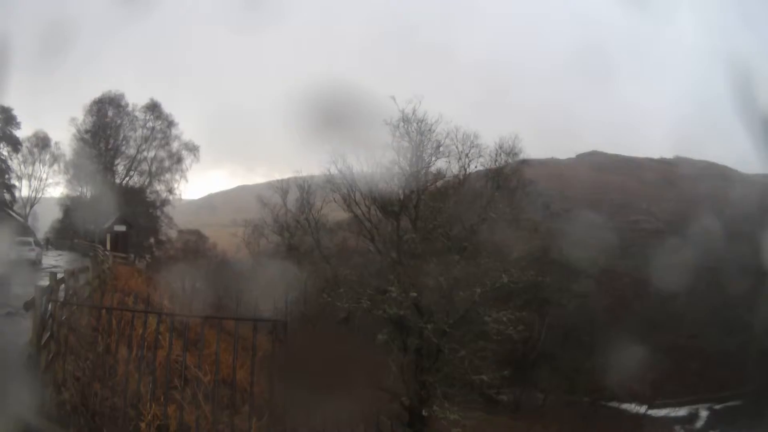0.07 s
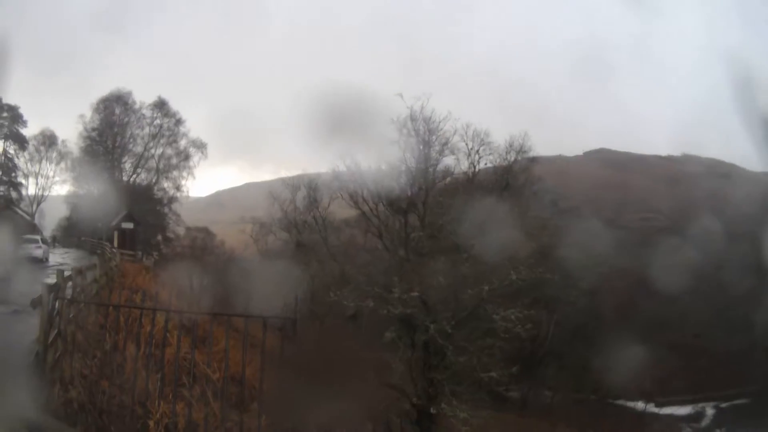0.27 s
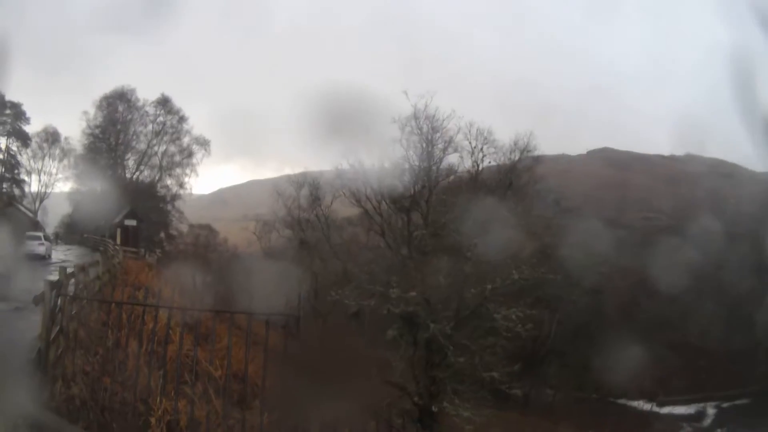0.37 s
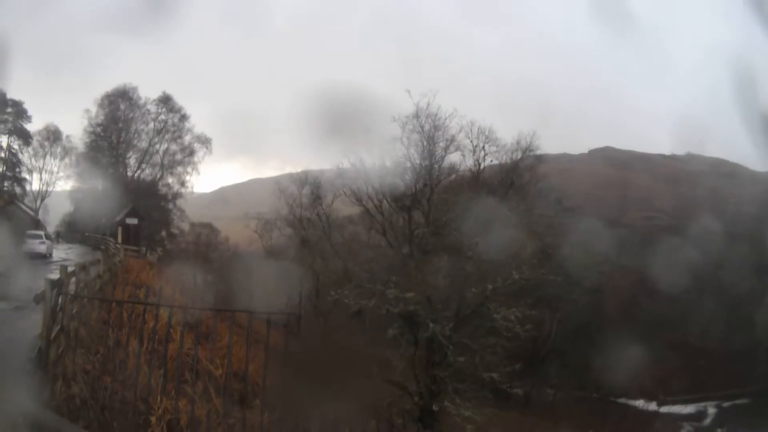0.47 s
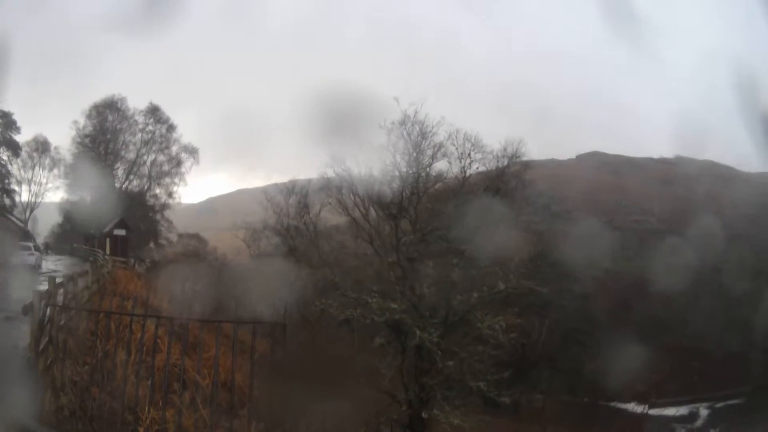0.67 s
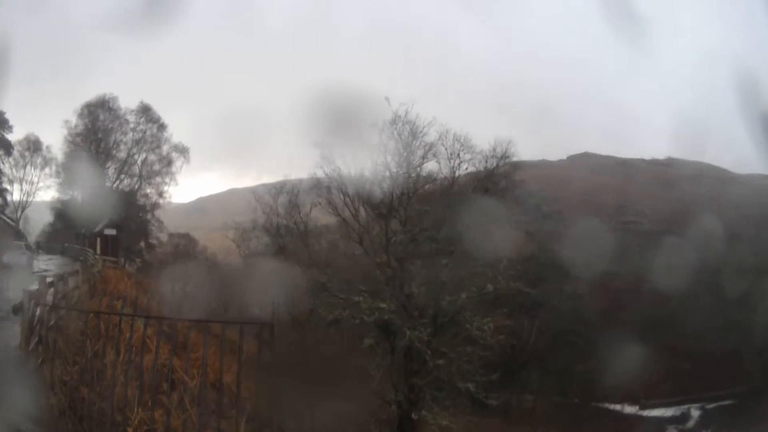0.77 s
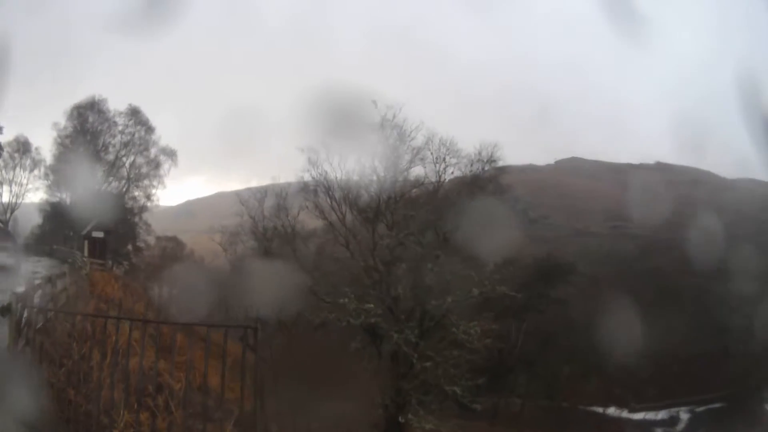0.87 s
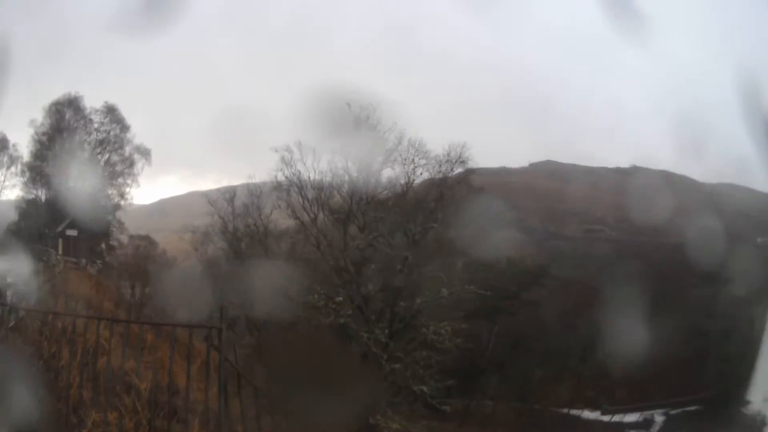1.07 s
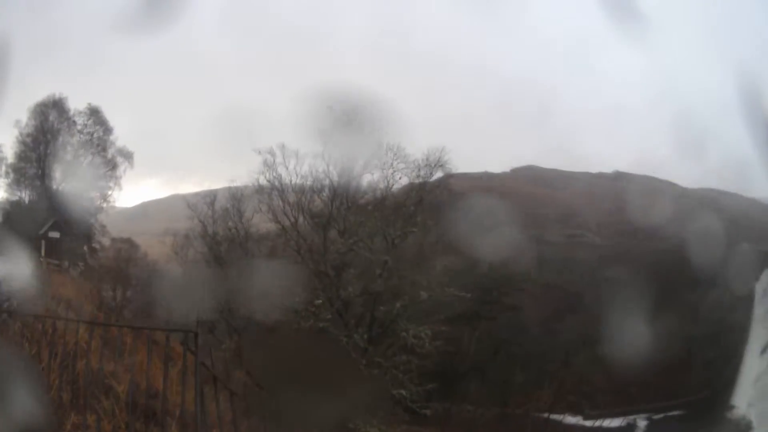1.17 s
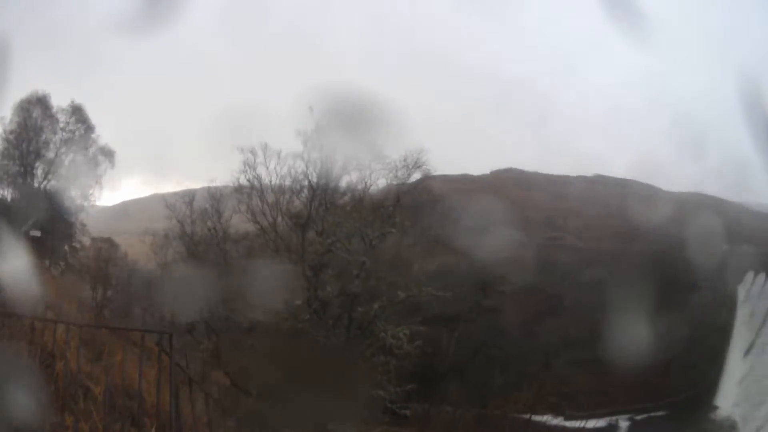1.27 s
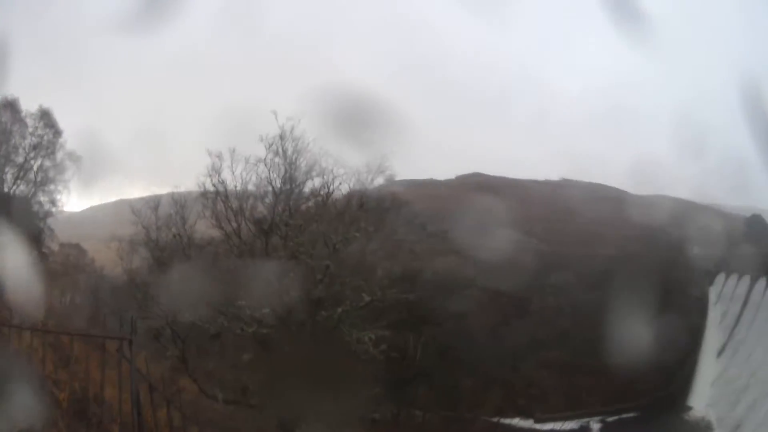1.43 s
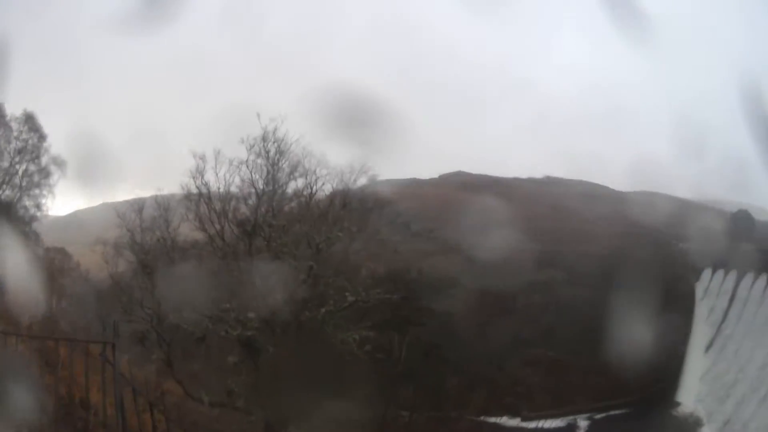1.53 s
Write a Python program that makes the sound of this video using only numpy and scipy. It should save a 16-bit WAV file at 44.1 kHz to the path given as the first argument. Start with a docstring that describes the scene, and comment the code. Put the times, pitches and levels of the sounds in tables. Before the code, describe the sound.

Hail clicks and knocks on a hollow casing right at the microphone, outdoors. The hits build quickly to one loud crack, then thin out over fine sleet patter, rain hiss and low wind that rises near the end.

```python
"""Sleet and hail blow against a camera housing; each impact excites modes that decay exponentially.
From the start rain hisses, wind rumbles and resonates in the hollow housing, and fine sleet patters.
Stones soon tick on the thin microphone cover and knock the shell, wet lumps plop, and the rim pings.
The loudest hits carry a low thump and clip with a harsh crack; at 0.4 s the largest stone shatters.
The hail then thins out, and a gust rises near the end."""
import sys
import numpy as np
from scipy import signal
from scipy.fft import rfft, irfft
from scipy.io import wavfile

SR = 44100
rng = np.random.default_rng(int(sys.argv[2]) if len(sys.argv) > 2 else 0)


def unload_audio(sound):
    """Save the sound as a 16-bit wav file, at the path given as the first command line argument."""
    columns = np.transpose(np.atleast_2d(sound))
    # keep every value between -1 and 1, then stretch to whole-number steps
    steps = np.round(np.clip(columns, -1, 1) * 32767)
    wavfile.write(sys.argv[1], SR, steps.astype(np.int16))


N = 70560
TIME = np.arange(N) / SR


def amp(db):
    """Decibels to amplitude ratio."""
    return 10 ** (np.asarray(db) / 20)


def unit_rms(x):
    """Normalisation to rms 1."""
    return x / np.sqrt(np.mean(x ** 2) + 1e-20)


def add(mix, start_s, sound):
    """Superposition of a sound on the mix."""
    part = mix[max(round(start_s * SR), 0):][:len(sound)]
    part += sound[:len(part)]


def low_cut(x, hz):
    """Second-order high-pass filtering."""
    return signal.sosfilt(signal.butter(2, hz, "high", fs=SR, output="sos"), x)


def noise(spectrum):
    """Spectral shaping of white noise, at rms 1."""
    hz, db = np.transpose(spectrum)
    freqs = np.fft.rfftfreq(N, 1 / SR)
    gain = amp(np.interp(np.log(freqs + 1), np.log(hz), db))
    return unit_rms(irfft(rfft(rng.standard_normal(N)) * gain, N))


def flutter(rate_hz, depth_db):
    """Random amplitude modulation: a gain that wanders at rates around rate_hz."""
    ratio = np.fft.rfftfreq(N, 1 / SR) / rate_hz
    wander = irfft(rfft(rng.standard_normal(N)) * ratio / (1 + ratio ** 4), N)
    return amp(depth_db * unit_rms(wander))


def ring(modes, stretch=1, contact_s=0.00019):
    """Impact response: modes build up during contact, then decay by 60 dB in stretch * t60."""
    t = np.arange(SR // 8) / SR
    onset = 1 - np.exp(-t / contact_s)
    waves = sum(amp(db) * np.exp(-np.log(1000) * t / (t60 * stretch)) * np.sin(2 * np.pi * hz * t)
                for hz, db, t60 in modes)
    return onset * waves / np.sqrt(sum(amp(db) ** 2 for _, db, _ in modes))


# Spectra of buffeting, cavity noise and rain: (frequency [Hz], relative density [dB])
RUMBLE_SPECTRUM = [(20, -24), (45, -10), (85, 1.5), (170, 2.5), (300, -4.5), (500, -17), (1200, -38)]
CAVITY_SPECTRUM = [(100, -35.5), (300, -13), (560, -13.5), (700, -12.5), (800, 7.5), (860, 1), (930, 2),
                   (1020, -5.5), (1120, -2.5), (1300, -11.5), (1600, -19), (2200, -23.5), (3400, -12),
                   (4500, -22), (5500, -33.5), (8500, -42)]
RAIN_SPECTRUM = [(200, -3), (1500, 0), (2200, -6.5), (2800, -3.5), (3150, -8.5), (3500, 0.5), (3850, -3),
                 (4300, 0.5), (4620, -2.5), (4950, -27.5), (5700, -26), (6400, -14.5), (6900, -13),
                 (7700, -16), (8500, -45)]
# Relative envelopes: (time [s], rumble level [dB], cavity level [dB], rain level [dB])
WEATHER_LEVELS = [(0, -42, -40.5, -47), (.13, -48, -40, -43.5), (.27, -47.5, -45, -46.5),
                  (.42, -52, -52.5, -46), (.58, -43.5, -38.5, -50), (.71, -58.5, -47.5, -49.5),
                  (.8, -46.5, -46, -51), (.86, -43, -41.5, -50), (.97, -51, -47.5, -51),
                  (1.07, -45.5, -39.5, -44.5), (1.16, -51, -42.5, -52.5), (1.22, -38.5, -38, -50.5),
                  (1.34, -38, -33, -44.5), (1.409, -42.5, -39.5, -49), (1.51, -38, -39.5, -47.5),
                  (1.6, -39.5, -44.5, -46.5)]


def wind_and_rain():
    """Broadband excitation: wind buffets the microphone and drives cavity resonances as rain hisses."""
    times, *levels = np.transpose(WEATHER_LEVELS)
    rumble_db, cavity_db, rain_db = (np.interp(TIME, times, db) for db in levels)
    rumble = amp(rumble_db - 6) * noise(RUMBLE_SPECTRUM) * flutter(rate_hz=50, depth_db=2.75)
    cavity = amp(cavity_db - 1.5) * noise(CAVITY_SPECTRUM) * flutter(rate_hz=20, depth_db=1.13)
    rain = amp(rain_db + 1) * noise(RAIN_SPECTRUM) * flutter(rate_hz=60, depth_db=2.54)
    return rumble + cavity + rain


# Modes of the cover, its bright edge and the hollow body: (frequency [Hz], relative level [dB], t60 [s])
COVER_MODES = [(450, -21.5, 0.0052), (2106, -18, 0.0036), (3182, 1, 0.0024), (4105, 4, 0.0031),
               (4480, -7.5, 0.0016), (5400, -23, 0.0041)]
EDGE_MODES = [(6286, 18.5, 0.0055), (6960, 5, 0.0085), (7120, -14, 0.0014)]
BODY_MODES = [(620, -16, 0.013), (801.7, -3.5, 0.067), (1050, 4, .012), (1127, 0, 0.028),
              (1290, -16, 0.004), (2000, -33, .008)]


def patter(grains_per_s=400, floor_db=-40.5, spread_db=4):
    """Shot noise: fine sleet lands at random, each grain exciting the housing's parts differently."""
    grain_db = floor_db + spread_db * np.minimum(rng.exponential(1, N), 4)
    impulses = amp(grain_db) * (rng.random(N) < grains_per_s / SR)
    parts = [(COVER_MODES, 0), (EDGE_MODES, -35), (BODY_MODES, -35.5)]
    return sum(amp(db) * signal.fftconvolve(impulses * rng.uniform(-1.1, 1, N), ring(modes))[:N]
               for modes, db in parts)


def stones(hits, modes, gain_db, low_hz, scatter=0.12):
    """Modal superposition: each stone rings the struck part, the bright edge and the hollow body."""
    out = np.zeros(N)
    edge, body = ring(EDGE_MODES), low_cut(ring(BODY_MODES), hz=475)
    spots = rng.uniform(-1.1, 1, (len(hits), len(modes)))
    for (start_s, hit_db, edge_db, body_db, stretch), spot in zip(hits, spots):
        # Light, short blows land on different spots, so their mode frequencies scatter.
        detune = 1 + scatter * max(1 - stretch, 0) * spot
        spot_modes = [(hz * shift, db, t60) for (hz, db, t60), shift in zip(modes, detune)]
        struck = amp(hit_db + gain_db) * low_cut(ring(spot_modes, stretch), low_hz)
        add(out, start_s, struck + amp(edge_db) * edge + amp(body_db) * body)
    return out


# Cover impacts: (time [s], relative level [dB], edge level [dB], body level [dB], decay stretch [ratio])
COVER_HITS = [(.0655, -6.5, -15, -27.5, 0.83), (.1128, -12, -19.5, -32, 1.23), (.1574, -16, -37, -38, 1.15),
              (.1747, -20, -58, -33, 0.56), (.2241, 4.5, -13.5, -36, 1.08), (.3324, 0, -43, -50, 0.99),
              (.3365, 1.5, -28, -28, 1.3), (.4174, -18, -42, -32, 1.6), (.4360, -12, -28, -66, 0.64),
              (.5494, -13.5, -48, -61, 0.97), (.5598, -21, -50, -33, 0.89), (.6374, -25, -29.5, -29, 1.4),
              (.7148, -29, -49, -59.5, 1.26), (.7921, -21, -30.5, -36.5, 1.14),
              (.8353, -9, -19.5, -32.5, 1.1), (.8663, -22.5, -58, -44, 1.2),
              (1.0229, -21.5, -44, -40, 0.55), (1.0347, -14, -40, -44, 0.66), (1.0517, -29, -37, -32.5, 1),
              (1.0628, -19.5, -35, -49, 1), (1.1112, -20, -32.5, -31, 1.24)]


def ticks():
    """Heavy damping: the thin cover, struck by small stones, rings for only milliseconds."""
    return stones(COVER_HITS, COVER_MODES, gain_db=4, low_hz=120)


# Shell impacts: (time [s], relative level [dB], edge level [dB], body level [dB], decay stretch [ratio])
SHELL_HITS = [(.0732, -28, -30, -25, 0.48), (.3240, -26, -42, -19, 0.44), (.3459, -29, -46, -22, 0.71),
              (.3670, -13.5, -36, -22.5, 0.52), (.3843, -11, -15, -29, 0.81), (.3935, 4, -8, -34, 0.76),
              (.4300, -14.5, -22, -26.5, 0.81), (.4667, -13, -13.5, -17, 0.45),
              (.4722, -26.5, -31, -60, .5), (.5158, -50, -41, -28, .7), (.5448, -20.5, -26.5, -26.5, 0.65),
              (.5533, -32, -42, -37, 0.56), (.5973, -23.5, -48, -38.5, 0.64),
              (.6812, -49, -39, -38.5, 0.35), (.8745, -34, -47.5, -44, 0.36),
              (.8880, -31, -33, -54.5, 0.48)]
# Shell resonances: (frequency [Hz], relative level [dB], t60 [s])
SHELL_MODES = [(929, -8.5, 0.03), (1505, -7, .014), (1567, -8, 0.018), (2300, -11, 0.012), (2262, -9, .047),
               (2997, -7, 0.017), (3250, -10, 0.0097), (3300, -11.5, 0.036), (3534, -6.5, 0.015),
               (3760, -12, 0.023), (4120, -5.5, 0.013), (5355, -15, 0.03), (6550, -17.5, 0.032),
               (6880, -18, 0.022), (7540, -10.5, 0.017), (8420, -22.5, 0.014)]


def knocks():
    """Inharmonic vibration: larger stones excite the many modes of the shell in a clack."""
    return stones(SHELL_HITS, SHELL_MODES, gain_db=1, low_hz=450)


# Soft impacts: (time [s], level before filtering [dB], decay stretch [ratio], cutoff [Hz])
WET_LUMPS = [(.1125, -20, 2.2, 855), (.3242, -28, 0.23, 1600), (0.405, -13.5, 0.43, 1640),
             (.4677, -10.5, 0.85, 3000), (0.516, -27, 0.7, 1080), (.8878, -22, 2.1, 884)]


def plops():
    """Soft contact is a low-pass filter: the softer the wet lump, the duller the hollow body rings."""
    out = np.zeros(N)
    for start_s, db, stretch, cutoff_hz in WET_LUMPS:
        softness = signal.butter(3, cutoff_hz, fs=SR, output="sos")
        body = ring(BODY_MODES, stretch, contact_s=0.00017)
        add(out, start_s, amp(db) * signal.sosfilt(softness, body))
    return low_cut(out, hz=475)


# Rim impacts: (time [s], relative level [dB], edge level [dB], body level [dB], decay stretch [ratio])
RIM_HITS = [(.2007, -19.5, -34, -44, 0.8), (.4374, -14.5, -42, -58, 0.66), (.6088, -24, -39, -32, 1.4),
            (.9541, -25, -24.5, -47, 0.66)]
# Rim resonances: (frequency [Hz], relative level [dB], t60 [s])
RIM_MODES = [(3480, -8.5, 0.0047), (4380, -1, 0.012), (6860, -5.5, 0.0053)]


def pings():
    """Free vibration: glancing stones leave the rim ringing, pitched by one dominant mode."""
    return stones(RIM_HITS, RIM_MODES, gain_db=2, low_hz=607)


# Thumps under the loudest hits: (time [s], level [dB])
THUMP_HITS = [(0.2261, -27.5), (0.336, -28.5), (0.3943, -15.5)]
# Low components of a thump: (frequency [Hz], relative level [dB], t60 [s])
THUMP_MODES = [(75, -21, 0.012), (176, 6, 0.017)]


def thumps():
    """Damped oscillation: a short, low thump sounds under the loudest hits."""
    out = np.zeros(N)
    for start_s, db in THUMP_HITS:
        add(out, start_s, amp(db) * ring(THUMP_MODES))
    return low_cut(out, hz=46)


# Spectrum of ice splinters: (frequency [Hz], relative density [dB])
SHARD_SPECTRUM = [(2500, -4), (4500, 1.5), (5500, -1), (6200, -6), (7000, -0.5), (8250, -9), (9500, -19)]


def shatter(start_s=0.395, level_db=-29.5, t60_s=0.1):
    """Brittle fracture: the largest stone bursts into a spray, heard as exponentially fading noise."""
    age = TIME - start_s
    envelope = (age > 0) * np.exp(-np.log(1000) * abs(age) / t60_s)
    return amp(level_db) * envelope * noise(SHARD_SPECTRUM)


def scene():
    """Linear superposition of hail, sleet, wind and rain in one channel."""
    hail = ticks() + pings() + knocks() + thumps() + shatter()
    return (hail + plops() + patter() + wind_and_rain())[None]


def record(dry, full_scale=1.0, cutoff_hz=8550):
    """Saturation and band limiting: the loudest hits clip at full scale with a harsh crack."""
    clipped = np.clip(dry, -full_scale, full_scale)
    low_pass = signal.firwin(255, cutoff_hz, window=("kaiser", 8), fs=SR)
    return signal.oaconvolve(clipped, low_pass[None], "same")


dry = scene()
out = record(dry)
unload_audio(out)
```